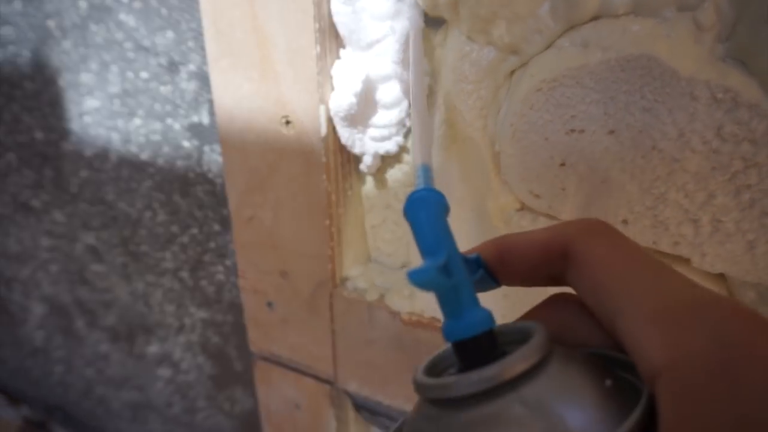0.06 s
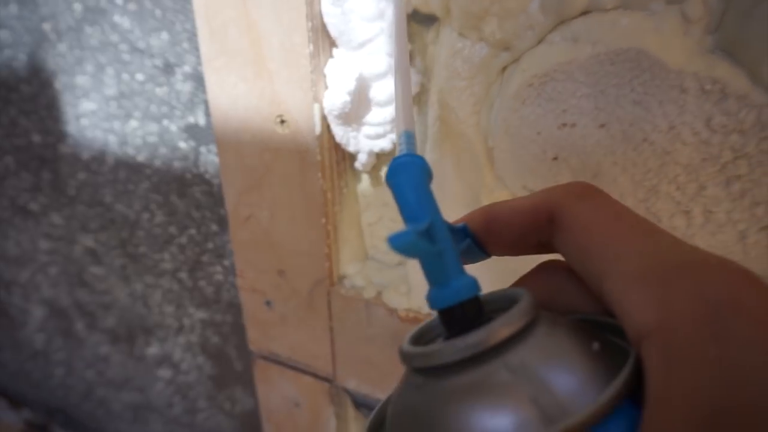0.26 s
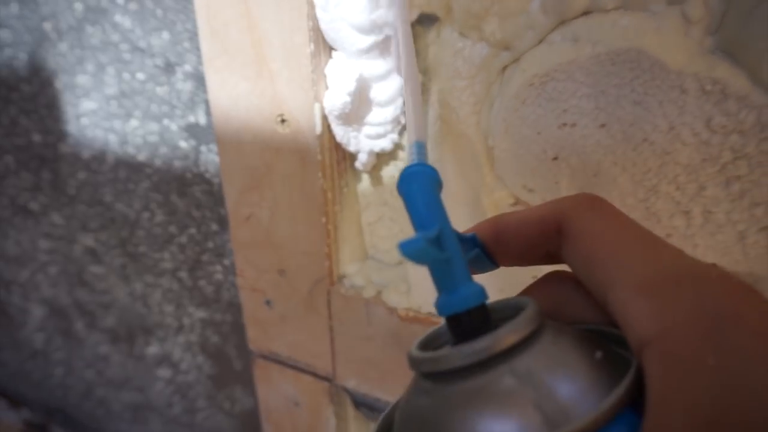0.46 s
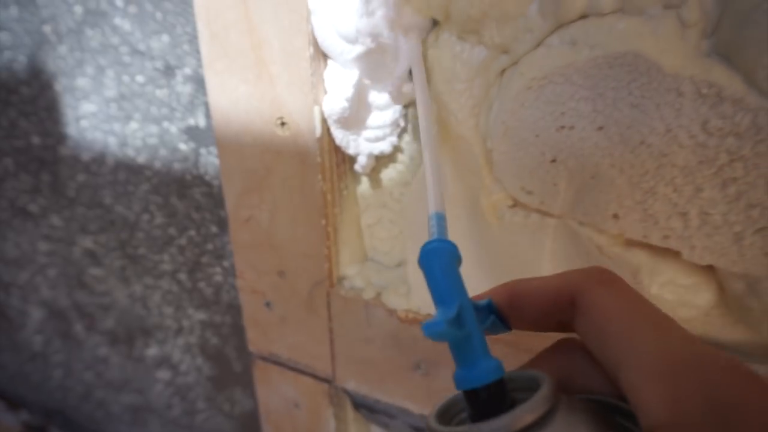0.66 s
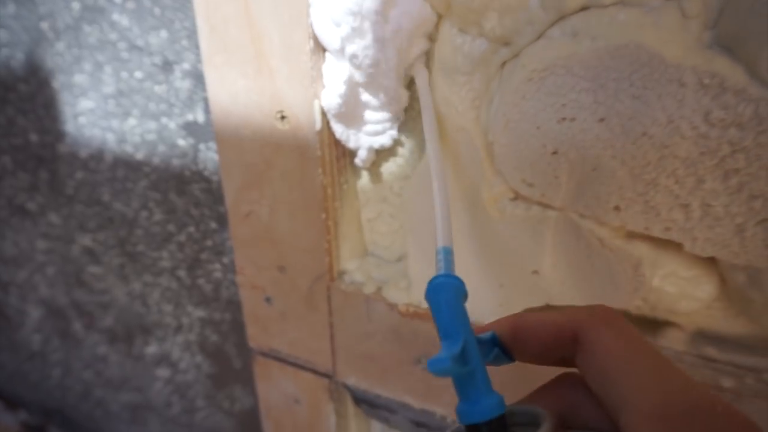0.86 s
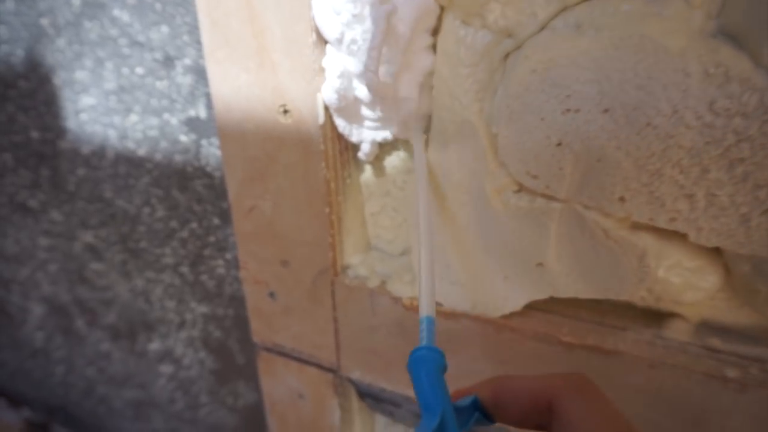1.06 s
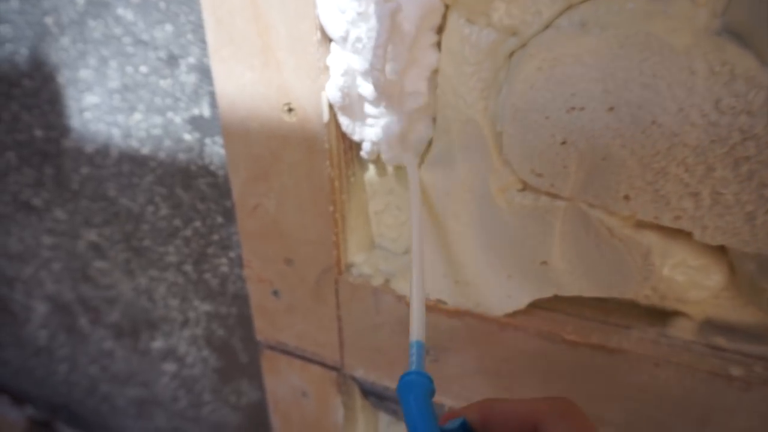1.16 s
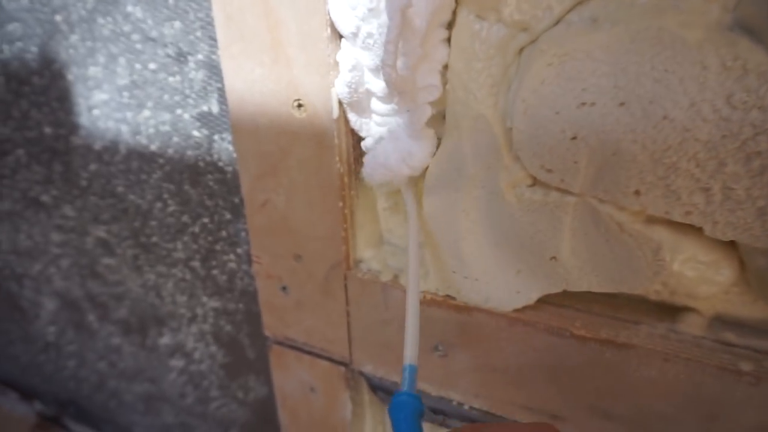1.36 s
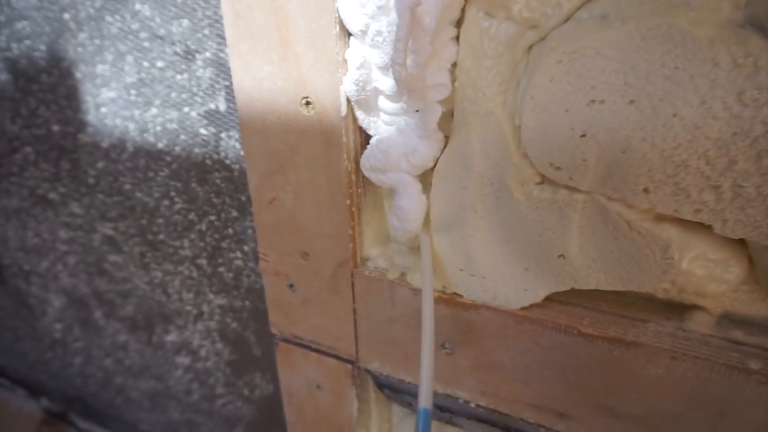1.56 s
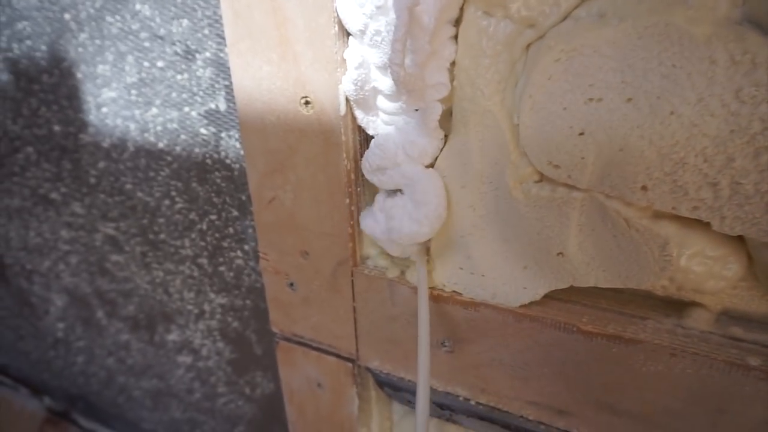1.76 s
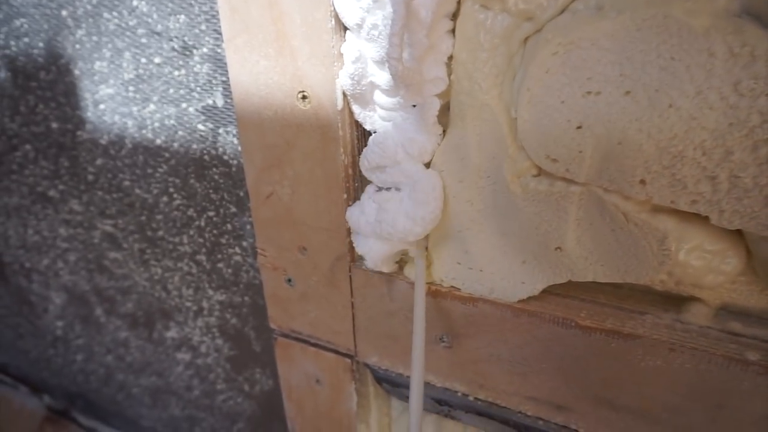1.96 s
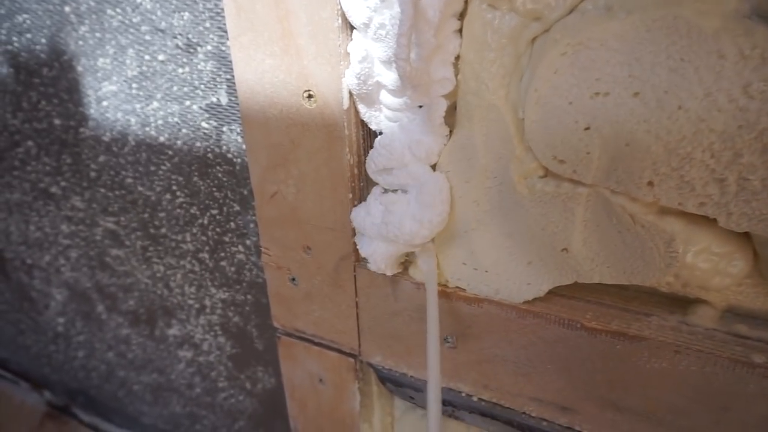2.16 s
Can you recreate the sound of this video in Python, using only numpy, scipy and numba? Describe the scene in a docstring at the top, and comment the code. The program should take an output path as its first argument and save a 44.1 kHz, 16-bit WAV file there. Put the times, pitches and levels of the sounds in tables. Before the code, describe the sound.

Foam sealant sprays from a can through a straw in one long squeeze, first a muffled, gurgling hiss in a gap, then a louder, rasping sputter in the open, close up in a small, dry van interior.

```python
"""One long squeeze of foam sealant through a straw into a gap in the wooden lining of a van.
Random pops and a noise jet make the bursting gas bubbles: they gurgle in the hollow gap, and as it fills
and the straw is drawn out they rasp and fizz in the open. The panel behind the tip returns a delayed copy.
Decaying noise makes the brief ring of the cabin; outdoor noise, a thin hush and a low hum lie beneath."""
import sys
import numpy as np
from scipy import signal
from scipy.fft import rfft, irfft
from scipy.io import wavfile
from scipy.ndimage import uniform_filter1d, map_coordinates
from numba import njit

SR = 44100
rng = np.random.default_rng(int(sys.argv[2]) if len(sys.argv) > 2 else 0)


def waveform_to_disk(signal):
    """Save audio, clipped to [-1, 1], as 16-bit WAV at the path in sys.argv[1]."""
    frames = np.transpose(np.atleast_2d(signal))
    scaled = np.clip(frames, -1, 1) * 32767
    samples = np.round(scaled).astype(np.int16)
    wavfile.write(sys.argv[1], SR, samples)


N = 97020


def undb(db):
    """Decibels to gain."""
    return 10 ** (np.asarray(db) / 20)


def curve(rows):
    """Rows (s, value) joined by straight lines, one value per sample."""
    times, values = np.array(rows, float).T
    return np.interp(np.arange(N) / SR, times, values)


def unit(x):
    """Scale to rms 1."""
    return x / np.sqrt(np.mean(x ** 2))


def even(x, size=3000):
    """Hold the slow level at rms 1 and keep the fast grain."""
    return x / np.sqrt(uniform_filter1d(x ** 2, size) + 1e-18)


def walk(rate):
    """Smooth random wander with rms 1, steered by `rate` random knots per second."""
    knots = rng.standard_normal(2048)
    return unit(map_coordinates(knots, [np.arange(N) / SR * rate], order=2, mode="wrap"))


def colour(x, points, size=4096):
    """Causal minimum-phase filter through (Hz, dB) points."""
    hz, db = np.array(points, float).T
    grid = np.maximum(np.fft.rfftfreq(size, 1 / SR), 1)
    gain = undb(np.interp(np.log(grid), np.log(hz), db))
    # folding the cepstrum forward in time makes the filter minimum-phase
    cepstrum = irfft(np.log(gain))
    cepstrum[1:size // 2] *= 2
    cepstrum[size // 2 + 1:] = 0
    impulse = irfft(np.exp(rfft(cepstrum)))
    return signal.fftconvolve(x, impulse)[:N]


@njit
def resonate(x, hz, width):
    """State-variable band-pass with a moving centre and width, both in Hz."""
    y, band, low = np.empty(len(x)), 0., 0.
    for i in range(len(x)):
        g, damping = np.tan(np.pi * hz[i] / SR), width[i] / hz[i]
        v = (band + g * (x[i] - low)) / (1 + g * (g + damping))
        band, low, y[i] = 2 * v - band, low + 2 * g * v, damping * v
    return y


def steady(value):
    """A setting held for the whole scene."""
    return np.full(N, float(value))


def pops(rate, spread_db):
    """Bubbles bursting at random moments, with random signs and sizes."""
    hit = rng.random(N) < rate / SR
    sign = np.sign(rng.standard_normal(N))
    size_db = spread_db * np.clip(rng.standard_normal(N), -2, 2)
    return unit(hit * sign * undb(size_db))


def pan(x, db):
    """Place a sound between left and right by their level difference (L-R, dB)."""
    return x * undb(np.array([[db], [-db]]) / 2)


# How far the tip is out of the gap. Each row: time in seconds, share from 0 to 1.
OUT_OF_GAP = [(.18, 0.14), (.3, 0.2), (.5, 0.38), (.65, 0.32), (.85, 0.32), (.99, 0.23), (1.08, 1),
              (1.3, 1), (1.9, 0.8)]
# First frequency cancelled by the echo off the panel; it rises as the tip nears the surface.
# Each row: time in seconds, frequency in Hz.
ECHO_NOTCH_HZ = [(.2, 1240), (.55, 1160), (.8, 1160), (.9, 1290), (1.0, 1450), (1.08, 1710), (1.15, 1740),
                 (1.2, 1870), (1.25, 2310), (1.3, 3030), (1.4, 3180), (1.44, 6000), (1.63, 6400),
                 (1.75, 7450), (1.87, 7900)]
# The foam on the panel dulls the echo. Each row: frequency in Hz, gain in dB.
ECHO_COLOUR = [(1200, -2.5), (3500, -3.5), (6000, -4), (10000, -4.5)]
ECHO_GAIN, ECHO_LOSS_NEAR = .5, 0.15  # the loss is the share taken off the echo when fully out
BURSTS_PER_S, BURST_SPREAD_DB, JET_DB = 2800, 5, -5  # the jet is set against the bursts
SPUTTER_DB, SPUTTER_PER_S = 1.5, 203.5
CHOKE_DB, CHOKE_PER_S = 2, 150  # foam chokes and frees the buried tip


def tip(sputter_db):
    """Sputtering bursts and gas jet, more uneven while buried, with their echo off the panel."""
    out = curve(OUT_OF_GAP)
    choke_db = CHOKE_DB * (1 - out) * np.tanh(walk(CHOKE_PER_S))
    flow_db = sputter_db * walk(SPUTTER_PER_S) + choke_db
    gas = pops(BURSTS_PER_S, BURST_SPREAD_DB) + undb(JET_DB) * rng.standard_normal(N)
    x = gas * undb(flow_db)
    # an echo half a cycle late cancels the notch frequency
    lag = SR / (2 * curve(ECHO_NOTCH_HZ))
    echo = map_coordinates(colour(x, ECHO_COLOUR), [np.arange(N) - lag], order=3, mode="mirror")
    return x + ECHO_GAIN * (1 - ECHO_LOSS_NEAR * out) * echo


# Resonances of the straw and nozzle. Each row: frequency in Hz, width in Hz, gain in dB.
STRAW = [(1443, 91, -1.5), (4060, 200, 0), (4970, 230, -7.5)]
# Resonance at the straw's mouth. Each row: time in seconds, frequency in Hz.
MOUTH_HZ = [(.2, 2820), (.45, 2320), (.8, 2900), (1.15, 2890), (1.28, 2570), (1.38, 2520), (1.5, 2850),
            (1.85, 2900)]
MOUTH_WIDTH_HZ, MOUTH_DB = 173, 0.5


def straw(x):
    """The straw rings at its own resonances; the one at its mouth shifts as the foam swells there."""
    rung = x + undb(MOUTH_DB) * resonate(x, curve(MOUTH_HZ), steady(MOUTH_WIDTH_HZ))
    for hz, width, db in STRAW:
        rung = rung + undb(db) * resonate(x, steady(hz), steady(width))
    return rung


# Hiss of the gas. Each row: time in seconds, level in dB.
HISS = [(0, -74), (.179, -41.5), (.184, -29.5), (.31, -28.5), (.4, -29), (.54, -30), (.6, -27), (.65, -22),
        (.7, -23.5), (.79, -26), (.91, -25.5), (.96, -20.5), (1.05, -21), (1.16, -21), (1.25, -20.5),
        (1.39, -21), (1.44, -23), (1.56, -20), (1.7, -17.5), (1.87, -19.5), (1.93, -27.5), (1.97, -45.5),
        (2.04, -56.5)]
# Tone of the hiss inside the gap and in the open. Each row: frequency in Hz, relative level in dB per Hz.
BURIED_COLOUR = [(60, -72), (200, -7), (900, -3), (1400, -8.5), (1800, 4.5), (2250, 4.5), (2550, 1.5),
                 (2850, -4.5), (3400, 0.5), (3900, 0.5), (4400, -14.5), (4900, -17), (5700, -44.5),
                 (9000, -37.5)]
OPEN_COLOUR = [(60, -30), (300, -27), (1400, -18), (2000, -5), (2330, -4), (2650, 3), (3100, 0), (3550, -1),
               (4000, 1.5), (4450, 2), (4950, -3), (5300, -2), (6000, -11), (7000, -15.5), (10000, -63)]
# Muffling by the foam that piles over the tip. Each row: time in seconds, share from 0 to 1.
MUFFLE = [(.2, 0), (.33, 0.13), (.44, 0.73), (.55, 0.64), (.63, 0)]
# Tone of the muffled share. Each row: frequency in Hz, gain in dB.
MUFFLED_COLOUR = [(1500, 3), (2300, -1.5), (3000, -3), (4000, -19), (8000, -2)]


def hiss():
    """Gas from the tip rings the straw, dulls under piled foam and changes tone as it leaves the gap."""
    x, out, muffle = tip(SPUTTER_DB), curve(OUT_OF_GAP), curve(MUFFLE)
    rung = straw((1 - muffle) * x + muffle * colour(x, MUFFLED_COLOUR))
    buried_hiss = (1 - out) * unit(colour(rung, BURIED_COLOUR))
    open_hiss = out * unit(colour(rung, OPEN_COLOUR))
    return even(buried_hiss + open_hiss) * undb(curve(HISS))


# Hiss ringing in the narrowing gap. Each row: time in seconds, frequency in Hz, level in dB.
SQUEEZE = [(.7, 2780, -93), (.78, 2840, -29), (.9, 2750, -30.5), (.95, 2570, -21.5), (1.0, 2500, -22),
           (1.04, 2920, -26.5), (1.09, 3200, -39), (1.12, 3480, -25), (1.17, 3400, -21.5),
           (1.249, 3740, -30), (1.30, 5700, -49), (1.35, 6130, -31), (1.405, 5960, -32), (1.425, 6550, -35),
           (1.5, 6500, -120)]
SQUEEZE_WIDTH_HZ = 600  # of each of two band-passes in a row


def squeeze(x):
    """The last of the gap narrows: after a first dip its resonance climbs, then dies away."""
    rows = np.array(SQUEEZE, float)
    hz, width = curve(rows[:, [0, 1]]), steady(SQUEEZE_WIDTH_HZ)
    ring = resonate(resonate(x, hz, width), hz, width)
    return even(ring) * undb(curve(rows[:, [0, 2]]))


# Larger gas pockets that spit from the straw.
# Each row: start in seconds, level in dB, decay time constant in seconds.
SPITS = [(0.185, -32, .008), (0.198, -31.5, 0.014), (0.309, -34.5, 0.014), (0.413, -36, 0.005),
         (0.631, -24, 0.024), (0.719, -22, 0.0088), (0.821, -20, 0.0059), (0.928, -31, 0.007),
         (1.068, -19.5, 0.05), (1.433, -20, .008)]
# Tone of the spits. Each row: frequency in Hz, relative level in dB.
SPIT_COLOUR = [(200, -31), (1200, -33), (2200, 3.5), (4200, 1), (4800, 5), (5400, 3), (6000, -11),
               (11000, -13.5)]


def spits():
    """A gas pocket leaves as a short puff of noise with a sudden start."""
    t = np.arange(N) / SR
    puffs = np.zeros(N)
    for at, db, decay in SPITS:
        puffs += undb(db) * (t >= at) * np.exp(-np.abs(t - at) / decay)
    return puffs * unit(colour(straw(rng.standard_normal(N)), SPIT_COLOUR))


# Rasp of the foam in the open. Each row: time in seconds, level in dB.
RASP = [(0, -54), (.9, -62), (1.0, -23), (1.15, -23), (1.22, -17), (1.34, -19), (1.44, -15.5), (1.59, -16),
        (1.64, -20), (1.73, -16.5), (1.8, -18), (1.866, -16), (1.94, -27.5), (1.985, -37.5), (2.05, -57)]
# Tone of the rasp. Each row: frequency in Hz, relative level in dB per Hz.
RASP_COLOUR = [(40, -88), (150, -27.5), (300, -27.5), (520, -15), (820, -17.5), (990, -8), (1250, -6),
               (1480, 2), (1750, 2.5), (1960, 1.5), (2280, -5.5), (3200, -6), (8000, -94)]
RASP_SPUTTER_DB = -0.33


def rasp():
    """Bursts at the tip, filtered to the middle range and less sputtering than the hiss."""
    return even(colour(tip(RASP_SPUTTER_DB), RASP_COLOUR)) * undb(curve(RASP))


# Fine fizz. Each row: time in seconds, level in dB.
FIZZ = [(.17, -62), (.185, -47), (.26, -54), (0.5, -49.5), (0.71, -36.5), (0.86, -37.5), (0.93, -31),
        (1.03, -32), (1.07, -26), (1.2, -27.5), (1.3, -30), (1.54, -26), (1.58, -31.5), (1.68, -25),
        (1.82, -32), (1.87, -27.5), (1.935, -44), (1.99, -60), (2.1, -67)]
# Tone of the fizz. Each row: frequency in Hz, relative level in dB per Hz.
FIZZ_COLOUR = [(100, -52), (1500, -12), (3600, -9), (4700, 6.5), (5600, 7.5), (7000, 7.5), (8200, 6.5),
               (9500, 4), (11000, -2.5)]


def fizz():
    """Bursts at the tip, filtered to the treble."""
    return even(colour(tip(SPUTTER_DB), FIZZ_COLOUR)) * undb(curve(FIZZ))


HISS_PAN_DB, RASP_PAN_DB, FIZZ_PAN_DB = 3.1, 2.7, 5.5  # L-R


def spray():
    """Hiss, narrowing gap and spits share one place; rasp and fizz have their own."""
    gas = hiss() + squeeze(straw(tip(SPUTTER_DB))) + spits()
    return pan(gas, HISS_PAN_DB) + pan(rasp(), RASP_PAN_DB) + pan(fizz(), FIZZ_PAN_DB)


# Gurgle in the gap. Each row: time in seconds, level in dB.
GURGLE = [(0, -48), (.18, -56), (.26, -37), (.33, -31), (.45, -28), (.56, -26), (.62, -29.5), (.72, -28.5),
          (.8, -25), (.92, -29.5), (1.0, -24.5), (1.09, -27.5), (1.16, -41), (1.3, -37), (1.74, -56),
          (1.85, -33.5), (1.95, -38.5), (2.02, -55), (2.1, -75)]
# Resonance of the gap. Each row: time in seconds, frequency in Hz.
GAP_HZ = [(.25, 790), (.55, 790), (.72, 595), (.8, 650), (.9, 710), (1.0, 613), (1.1, 635), (1.5, 680),
          (1.85, 870)]
# Width of that resonance. Each row: time in seconds, width in Hz of each of two band-passes in a row.
GAP_WIDTH_HZ = [(.3, 525), (.55, 466), (.8, 530), (.92, 516), (1.0, 280), (1.1, 290), (1.3, 610)]
# Tone of the gurgle. Each row: frequency in Hz, gain in dB.
GAP_COLOUR = [(60, -13), (400, 1.5), (700, 0.5), (1000, 2), (1250, -2), (3000, -32.5)]
GURGLE_PER_S, GURGLE_SPREAD_DB = 900, -0.5
THUD_DB, GURGLE_PAN_DB = -11.5, 0  # thud against the ring; L-R


def gurgle():
    """Larger bubbles ring the hollow gap until the foam closes it, and again as the flow slackens."""
    x, hz, width = pops(GURGLE_PER_S, GURGLE_SPREAD_DB), curve(GAP_HZ), curve(GAP_WIDTH_HZ)
    ring = colour(resonate(resonate(x, hz, width), hz, width), GAP_COLOUR)
    thud = colour(x, [(30, -25), (100, -19), (220, -12.5), (450, -13.5), (900, 3), (3000, -22.0)])
    both = even(ring) + undb(THUD_DB) * even(thud)
    return pan(both * undb(curve(GURGLE)), GURGLE_PAN_DB)


# Reflections common to both sides, and those opposed between them. Each row: frequency in Hz, gain in dB.
CABIN_MID = [(100, -35.5), (1000, -11), (4000, -7.5), (10000, -22)]
CABIN_SIDE = [(100, -27), (500, -14), (1500, -11), (2600, -13), (4000, -6.5), (6000, -6.5), (10000, -7)]
CABIN_T60_S, CABIN_DELAY_S = 0.16, 0.0014


def cabin(x, size=16384):
    """Short, dense reflections from the van's walls, as decaying noise."""
    t = np.arange(size) / SR
    decay = np.exp(-np.log(1000) * t / CABIN_T60_S) * (t > CABIN_DELAY_S)
    tails = rng.standard_normal((2, size)) * decay
    source = x.mean(axis=0)
    mid, side = (signal.fftconvolve(source, h / np.linalg.norm(h))[:N] for h in tails)
    return x + colour(mid, CABIN_MID) + colour(side, CABIN_SIDE) * np.array([[1], [-1]])


# Distant machine. Each row: frequency in Hz, base level in dB.
HUM = [(70, -63), (120, -57), (140, -49.5), (210, -55.5), (350, -55.5), (479, -53)]
# Level of the whole hum as heard: pressed down late under the loud spray, then back.
# Each row: time in seconds, level change in dB.
HUM_LEVEL = [(0, 2), (.15, 0.5), (.55, 5.5), (1.15, 4), (1.4, -1), (1.8, -10), (1.9, 0), (2.05, 1.5),
             (2.2, 0.5)]
HUM_WAVER_DB, HUM_WAVER_PER_S = 2.5, 6.78
HUM_DRIFT_RAD, HUM_DRIFT_PER_S = .2, 7.4


def hum():
    """The sine lines of a distant machine, each wavering in level and phase."""
    t = np.arange(N) / SR
    lines = np.zeros(N)
    for hz, db in HUM:
        level = np.sqrt(2) * undb(db + HUM_WAVER_DB * walk(HUM_WAVER_PER_S))
        drift = HUM_DRIFT_RAD * walk(HUM_DRIFT_PER_S)
        lines += level * np.sin(2 * np.pi * hz * t + drift)
    return lines * undb(curve(HUM_LEVEL))


# Tone of the outdoor noise. Each row: frequency in Hz, relative level in dB per Hz.
FLOOR = [(25, -15), (45, -14), (68, 0), (90, 0), (200, 3), (350, 8), (500, 6.5), (700, 0), (950, 5),
         (1300, 0.5), (2000, -2.5), (3000, -6.5), (4500, -20), (7000, -30), (11000, -39)]
# Its part opposed between the sides. Each row: frequency in Hz, gain in dB against the common part.
FLOOR_SIDE = [(60, -11.5), (300, -13), (800, -6), (2000, -1.5), (8000, 9)]
# Level of the outdoor noise as heard: ducked late under the loud spray, then back.
# Each row: time in seconds, level change in dB.
BACKGROUND = [(0, 0), (.55, 6), (1.1, 7), (1.3, 3), (1.8, -4), (1.92, 1.5), (2.1, -1.5)]
# Thin hush that dips as the spray starts, returns, then fades. Each row: time in seconds, level in dB.
HUSH = [(0, -41.5), (.15, -43), (.26, -54), (.5, -46), (1.9, -71)]
# Tone of the hush. Each row: frequency in Hz, relative level in dB per Hz.
HUSH_COLOUR = [(1000, -1), (3500, -1.5), (6000, 1), (11000, -3), (13000, -21)]
FLOOR_DB = -41.5  # before the level changes


def background():
    """Dull outdoor noise, with a thin hush above it, independent on each side."""
    mid, side = (unit(colour(rng.standard_normal(N), FLOOR)) * undb(FLOOR_DB) for _ in range(2))
    outdoors = mid + colour(side, FLOOR_SIDE) * np.array([[1], [-1]])
    hush = np.array([unit(colour(rng.standard_normal(N), HUSH_COLOUR)) for _ in range(2)])
    return outdoors * undb(curve(BACKGROUND)) + hush * undb(curve(HUSH))


# Tone of the left microphone for the spray and gurgle. Each row: frequency in Hz, gain in dB.
LEFT_TILT = [(100, -1.5), (1100, 0.9), (2000, -4.5), (3200, -1), (4500, 0), (6500, 1), (9000, -2.5)]


def scene():
    """Spray and gurgle in the cabin, over the background and the hum."""
    left, right = cabin(spray() + gurgle())
    return np.array([colour(left, LEFT_TILT), right]) + background() + hum()


GAIN_KNEE_DB, GAIN_TIME_S = -19.5, 0.1
GAIN_SLOPE = 0.35  # dB taken off per dB above the knee
CEILING, TOP_HZ = .8, 11150  # the ceiling rounds peaks ahead of the top cut


def record(dry):
    """Gain control eases down while the sound is loud; peaks are rounded and the top is cut."""
    keep = np.exp(-1 / (GAIN_TIME_S * SR))
    power = np.mean(dry ** 2, axis=0)
    heard = np.sqrt(signal.lfilter([1 - keep], [1, -keep], power))
    gain = np.maximum(heard / undb(GAIN_KNEE_DB), 1) ** -GAIN_SLOPE
    rounded = CEILING * np.tanh(dry * gain / CEILING)
    top_cut = signal.ellip(12, .2, 80, TOP_HZ, fs=SR, output="sos")
    return signal.sosfilt(top_cut, rounded)


dry = scene()
out = record(dry)
waveform_to_disk(out)
```